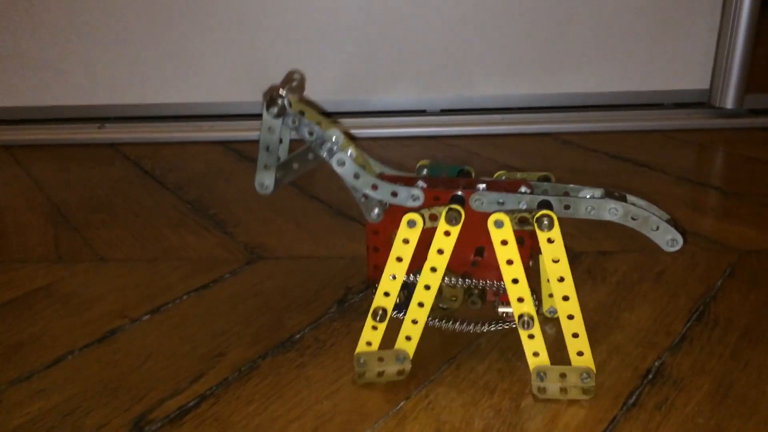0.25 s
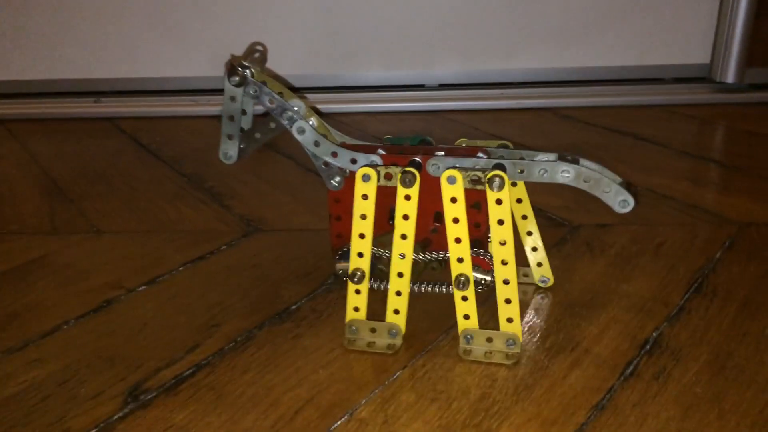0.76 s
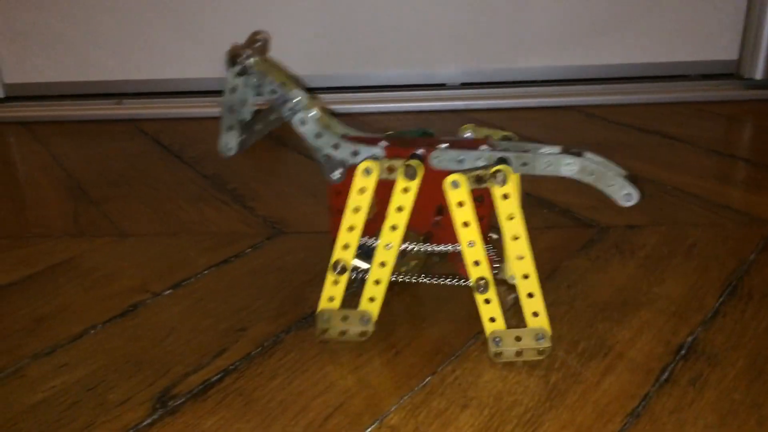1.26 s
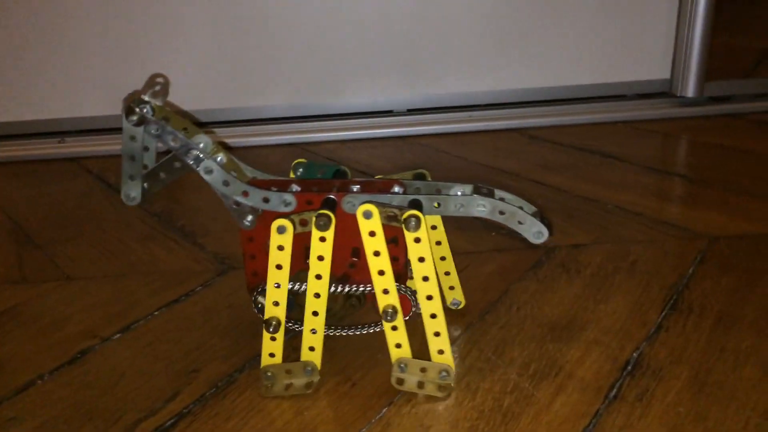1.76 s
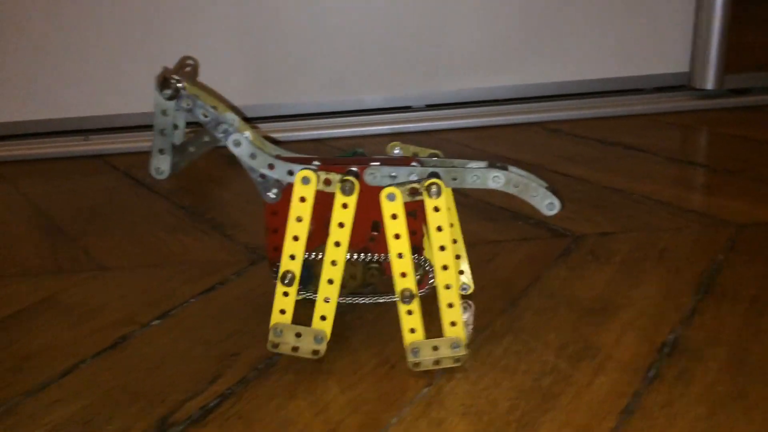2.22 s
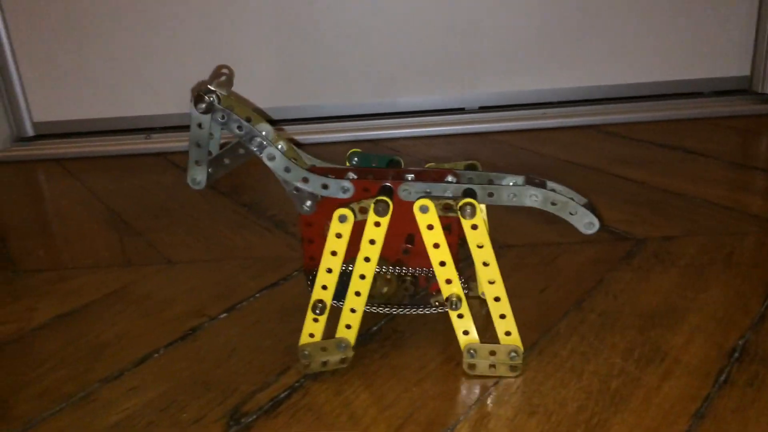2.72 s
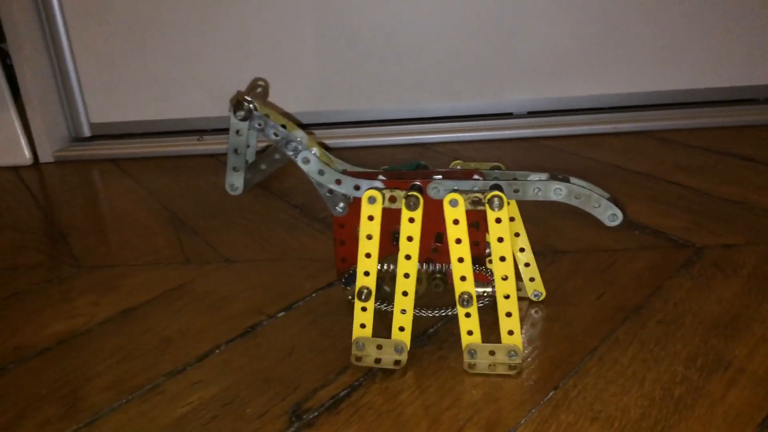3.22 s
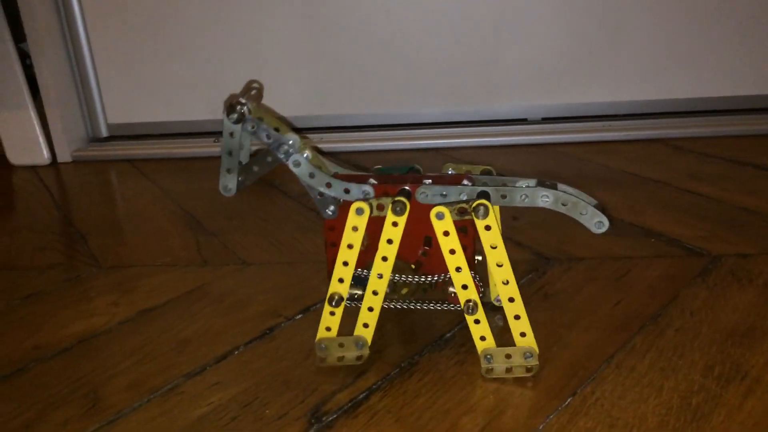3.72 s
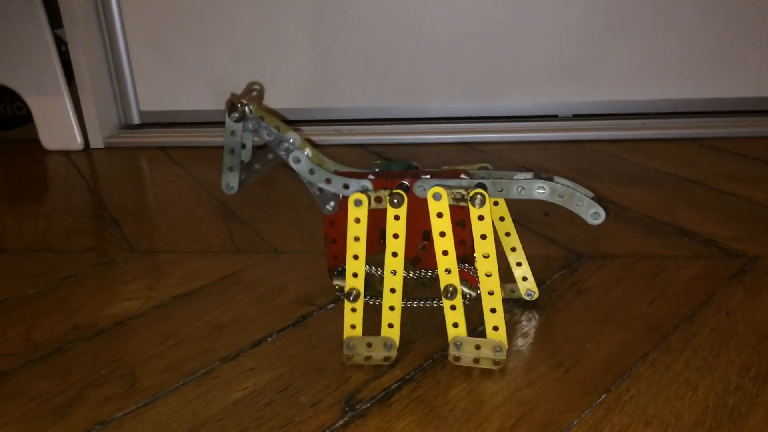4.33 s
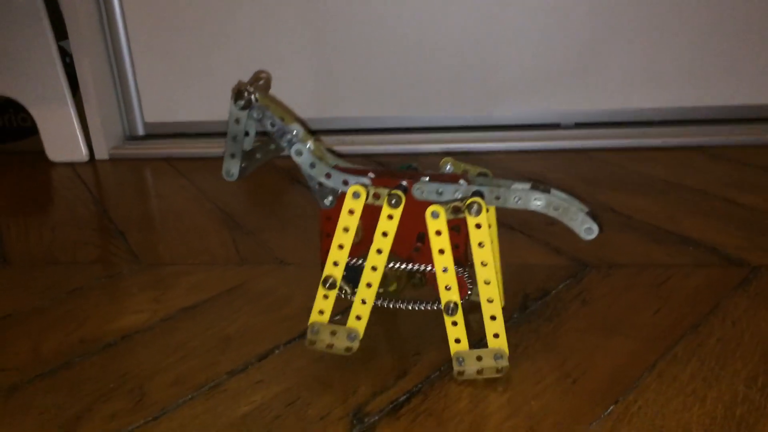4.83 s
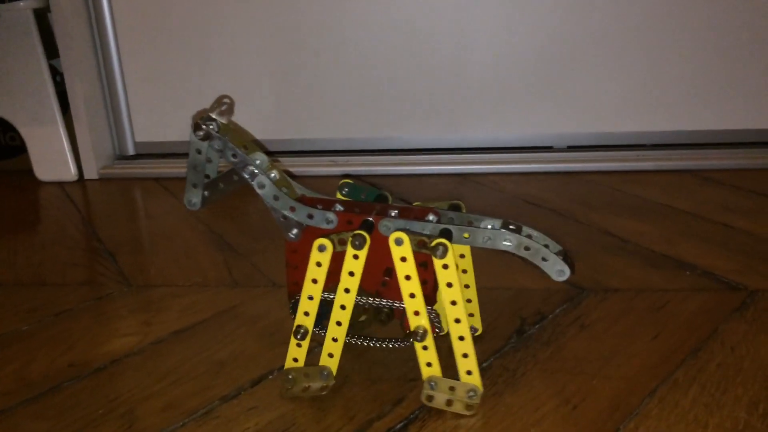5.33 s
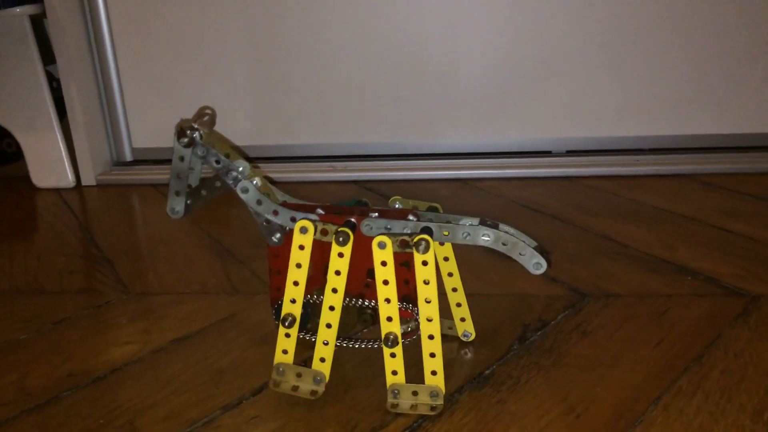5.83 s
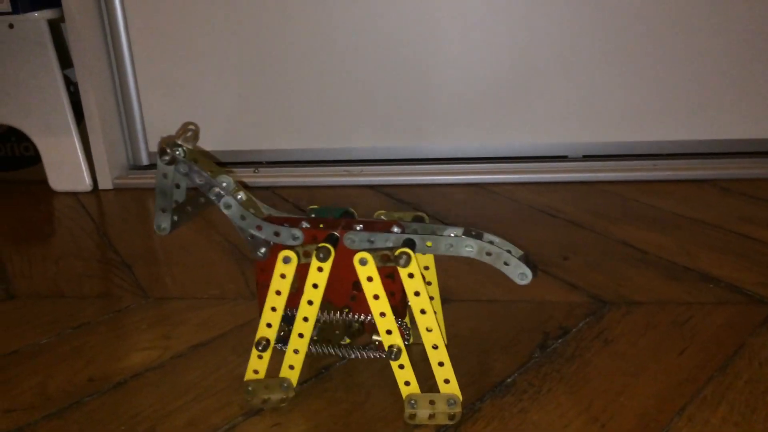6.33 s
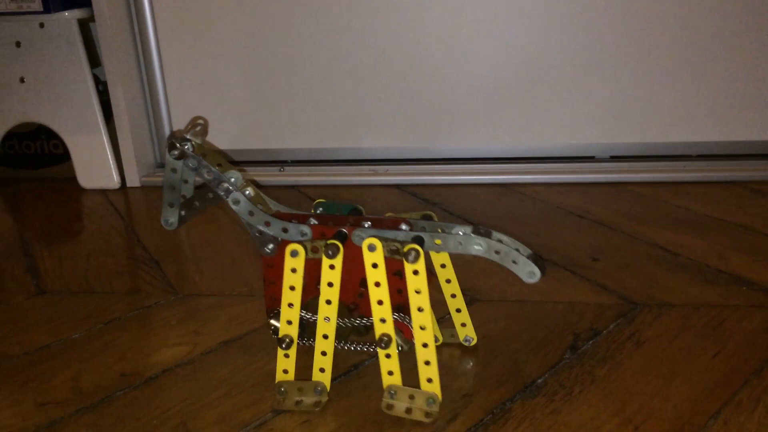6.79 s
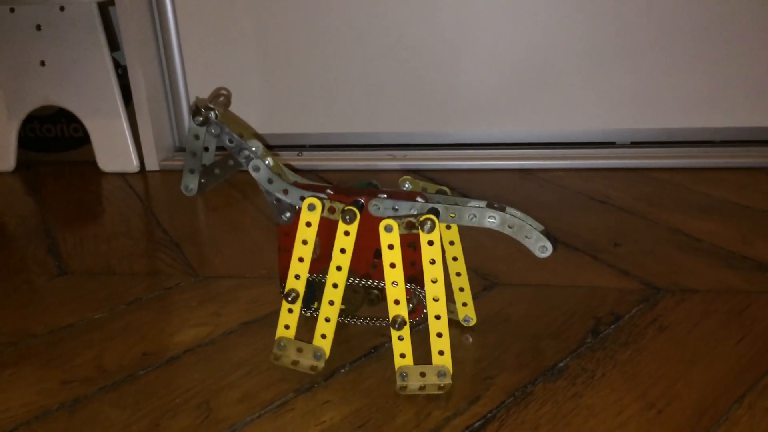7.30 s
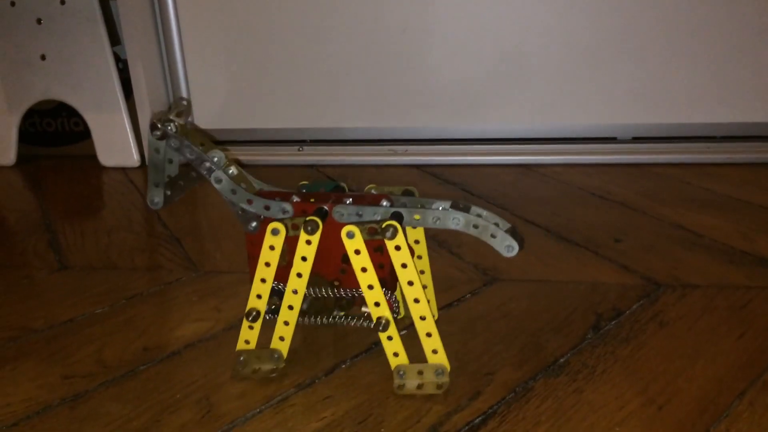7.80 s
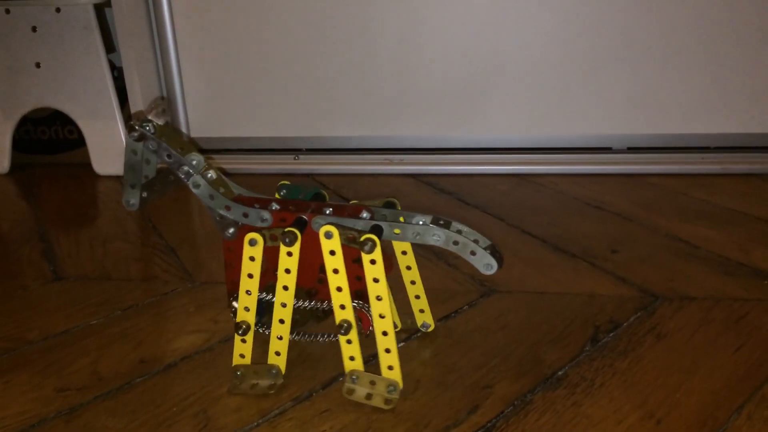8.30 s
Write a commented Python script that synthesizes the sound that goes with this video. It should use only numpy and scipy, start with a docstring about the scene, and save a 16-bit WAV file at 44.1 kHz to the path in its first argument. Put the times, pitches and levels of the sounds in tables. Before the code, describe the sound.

A clockwork toy whirrs and hums in surges as its metal feet clack and thump steadily across a wooden floor.

```python
"""A clockwork animal of bolted metal strips walks over a parquet floor in a small room.
From the start its governor (a spinning brake) whirrs against the steel frame and makes the boards hum.
In each stride the motor slows to lift the body, then races as it drops and two feet clack and thump down.
As the walk goes on, one droning floorboard fades away. Near the end the spring almost stalls and
single ticks of the drive stand out; the feet land once more, and the last stride is left unfinished."""
import sys
import numpy as np
from scipy import signal
from scipy.io import wavfile
from scipy.ndimage import uniform_filter1d

SR = 44100
rng = np.random.default_rng(int(sys.argv[2]) if len(sys.argv) > 2 else 0)


def transcribe(signal):
    """Save signal, clipped to [-1, 1], as a 16-bit WAV file at the path in sys.argv[1]."""
    frames = np.atleast_2d(signal).T
    limited = np.clip(frames, -1, 1)
    pcm = np.round(limited * 32767).astype(np.int16)
    wavfile.write(sys.argv[1], SR, pcm)


N = 377055
TIME = np.arange(N) / SR
WALK_START_S, WALK_END_S = -0.25, 8.674   # the walk begins before the sound and ends after it

# Levels in the tables are relative: each function sets its own overall level.
# The motor in each stride:
# run_up_s, slowest_hz, fastest_hz, slow_whirr_db, fast_whirr_db, hum_db, hum_octave_db
STRIDES = [(.44, 82, 99, -31, -22.5, -26.5, -39.5), (0.41, 85.5, 102, -29.5, -23.5, -27, -48),
           (.38, 84.5, 100, -29.5, -23.5, -31, -31.5), (.43, 84.5, 99, -29.5, -23, -27, -47),
           (.42, 84, 96, -31.5, -23.5, -26.5, -38), (.35, 83, 95.5, -32.5, -24, -28.5, -35),
           (.40, 77.5, 90, -32.5, -24, -28.5, -32), (.42, 80, 91, -33.5, -24.5, -28, -37.5),
           (.36, 80.5, 92.5, -32.5, -24.5, -27, -37.5), (.41, 81.5, 91.5, -34.5, -24.5, -27.5, -30),
           (.39, 76, 91.5, -34.5, -24.5, -29, -28.5), (.38, 76, 88.5, -35, -25.5, -32.5, -37.5),
           (0.38, 55, 90, -49.5, -24.5, -39.5, -30.5), (.42, 46, 88, -47, -25, -38, -46)]
# Ringing notes of the steel frame and side plates:
# pitch_hz, width_hz, walk_start_db, walk_end_db, extra_db_per_db_of_rubbing
FRAME_NOTES = [(2160, 350, -13.5, 1.5, 0.07), (2780, 1130, -6, -13, 0.04), (3210, 604, -1, -4, -0.23),
               (3863, 910, -7, -5.5, 0.02), (4920, 1120, -5.5, -10.5, 0), (5890, 1420, -6, -5.5, -0.28),
               (7135, 650, -3, -4, -0.02), (7770, 370, -0.5, 0.5, -0.1), (8240, 570, -3, 1.5, 0.26),
               (10170, 2870, -1.5, -6.5, -0.03), (11670, 850, -2, -3.5, -0.7),
               (13180, 1320, -1.5, -1, -0.2), (14800, 2400, -4, -4, 0)]
# Two feet landing one just after the other: start_s, second_foot_delay_s, first_clack_db,
# second_clack_db, frame_jolt_db, first_thump_db, second_thump_db, scuff_hz, hollow_note_db
LANDINGS = [(0.412, .034, -24, -15, -31, -5, -12, 1040, -3),
            (0.947, 0.045, -13, -12, -24, -10, -11, 1500, 4),
            (1.575, 0.04, -19, -7.5, -12, -8.5, -27, 1180, 1.5),
            (2.125, 0.04, -15.5, -15.5, -24, -4, -8, 830, 1.5),
            (2.788, 0.034, -23.5, -9.5, -30, -5.5, -15, 1280, 1.5),
            (3.320, 0.046, -16, -18.5, -15, -7, -14.5, 1000, 4),
            (4.017, 0.03, -22.5, -23.5, -41, -8.5, -9.5, 800, -1),
            (4.568, 0.044, -15.5, -18, -22, -10.5, -14, 606, -9),
            (5.256, .037, -18.5, -15.5, -19, -28, -4.5, 1310, -5),
            (5.838, 0.039, -13.5, -10, -14, -20, -12.5, 1310, -1),
            (6.529, .031, -23, -15, -25, -18, -12.5, 1040, -15),
            (7.117, 0.042, -12, -11.5, -14.5, -24, -8, 1140, -10),
            (8.003, .035, -22.5, -16.5, -17, -9.5, -11, 654, -9)]
# The body rocking back on to a raised foot after some landings: start_s, clack_db, thump_db
ROCK_BACKS = [(0.569, -24.5, -21), (1.102, -32, -18), (1.759, -27.5, -21), (2.303, -38, -16),
              (2.928, -28, -27), (3.508, -36.5, -17.5), (4.141, -29, -17), (4.765, -30, -21),
              (8.171, -25, -25.5)]
# Ringing notes of leg and board under a foot: pitch_hz, level_db, ring_s (time to fade by 60 dB)
FOOT_NOTES = [(327, 7.5, 0.043), (378, -8.5, 0.11), (482, -6, 0.082), (593, -3.5, 0.078), (733, 3, 0.029),
              (760, -27, 0.018), (1020, -2.5, 0.043), (1206, 1, 0.015), (1350, -12.5, 0.049),
              (1370, 0, 0.017), (1760, 3.5, 0.012), (1980, -7, 0.014), (2265, -0.5, 0.017),
              (2880, -4, 0.054)]
# Deep notes of the floor: pitch_hz, level_db, ring_s
FLOOR_NOTES = [(92, -6.5, 0.15), (111.5, 0.5, 0.26), (126.6, 8, 0.16), (176.7, -4, 0.094),
               (225, -15.5, 0.12), (299.5, -4.5, 0.073), (341, -16, 0.13)]
# The clearest ticks of chain and linkage: start_s, level_db
CLEAR_TICKS = [(4.903, -22.5), (6.0305, -16.5), (6.7730, -22), (7.2400, -21), (7.2735, -23.5),
               (7.3160, -21.5), (7.3455, -16), (7.4000, -24.5), (7.4295, -19.5), (7.4675, -23.5),
               (7.4945, -18.5), (7.5620, -24), (7.5960, -24), (7.6560, -18), (8.1510, -25), (8.2170, -25),
               (8.2382, -18), (8.2730, -18), (8.3285, -28), (8.3925, -16.5)]
# Tone of the gear rumble carried by the floor: pitch_hz, level_db
RUMBLE_SPECTRUM = [(25, -21), (50, 1.5), (80, -1.5), (120, 17), (165, -16), (230, -3), (330, -30),
                   (480, -37), (730, -21), (1000, -24), (1600, -22), (2400, -17.5)]
# A droning floorboard fading as the animal leaves it behind: time_s, level_db
DRONE_FADE = [(0, -43), (1.1, -44), (3.4, -48), (4.4, -49), (6.2, -68), (8.55, -77)]
# Tone of the still room: pitch_hz, level_db
AIR_SPECTRUM = [(25, -28), (60, -16), (115, -2), (400, -36), (620, -21), (950, -19), (1600, -29),
                (3000, -2), (15000, -5)]


def motor():
    """Lifting the body brakes the motor. Gives its speed in Hz and the whirr, hum and octave in dB."""
    _, slow_hz, fast_hz, soft_db, loud_db, top_hum_db, stride_octave_db = np.transpose(STRIDES)
    _, since_s, until_s = gait()
    speed_hz = stride_curve(slow_hz, fast_hz, fall_per_s=115, hold_s=0.02, coast_s=0.035)
    # The governor lets go of its drum as it slows.
    whirr_db = stride_curve(soft_db, loud_db, fall_per_s=139, hold_s=0.034, coast_s=0.091)
    low_hum_db = top_hum_db - 1.11 * (loud_db - soft_db)
    hum_db = stride_curve(low_hum_db, top_hum_db, fall_per_s=84, hold_s=0, coast_s=0.15)
    # Around a landing the legs bear less weight and pass on less hum.
    hum_db -= 4 * bump(np.minimum(since_s, until_s), width_s=0.092)
    # A board rings when the hum's octave (twice its pitch) sweeps through the board's own note.
    octave_hz, board_hz, board_width_hz = 2 * speed_hz, 170, 17
    board_gain = (octave_hz / board_hz) ** 0.96 / np.hypot(1, 2 * (octave_hz - board_hz) / board_width_hz)
    stride_ends_s = np.r_[np.transpose(LANDINGS)[0], WALK_END_S]
    octave_db = np.interp(TIME, stride_ends_s, stride_octave_db) + 20 * np.log10(board_gain)
    octave_db += 1.5 * bump(since_s - 0.054, width_s=0.098)   # landing presses the legs on to that board
    return speed_hz, whirr_db, hum_db, octave_db


def gait():
    """At every sample: which stride it is, the seconds since it began and the seconds until it ends."""
    edges_s = np.r_[WALK_START_S, np.transpose(LANDINGS)[0], WALK_END_S]
    stride = np.searchsorted(edges_s[1:-1], TIME)
    return stride, TIME - edges_s[stride], edges_s[stride + 1] - TIME


def stride_curve(lows, highs, fall_per_s, hold_s, coast_s):
    """The shape of a stride: a steady fall, a low stretch, then a run-up that tops out before landing."""
    stride, since_s, until_s = gait()
    run_up_s = np.transpose(STRIDES)[0][stride]
    falling = np.r_[lows[0], highs][stride] - fall_per_s * np.maximum(since_s - hold_s, 0)
    risen = np.clip((run_up_s - until_s) / np.maximum(run_up_s - coast_s, 1e-3), 0, 1)
    return np.maximum(falling, lows[stride] + (highs - lows)[stride] * risen)


def whirr(pace, turns, whirr_db, hits_per_s=4500):
    """The governor rubs its drum and gear teeth meet: tiny hits that thin out and stutter when slow."""
    crowding = pace ** 3.3
    hits = rng.random(N) < hits_per_s * crowding / SR
    sizes = from_db(-rng.standard_normal(N)) / np.sqrt(crowding)
    throb = 1 + 0.084 * np.cos(2 * np.pi * turns)
    stutter = from_db(drift(38) / pace ** 2.8)
    rub_db = np.maximum(whirr_db - np.median(whirr_db), -8)
    return rms_one(steel_frame(hits * sizes * throb * stutter, rub_db)) * from_db(whirr_db - 3)


def steel_frame(hits, rub_db=0):
    """Hits make the steel plates ring; the tone sways with the stance and shifts along the walk."""
    walked, out = TIME / TIME[-1], 0
    for hz, width_hz, start_db, end_db, rub_growth in FRAME_NOTES:
        ring = double_resonance(hits * rng.choice([-1, 1], N), hz, width_hz)
        level_db = start_db + (end_db - start_db) * walked + rub_growth * rub_db + 1.5 * drift(1.45)
        out += ring * from_db(level_db)
    return high_pass(out, hz=1900)


def footfalls():
    """Every touch of the floor: start_s, clack_db, jolt_db, thump_db, scuff_hz, hollow_note_db."""
    for start_s, delay_s, clack1_db, clack2_db, jolt_db, thump1_db, thump2_db, *spot in LANDINGS:
        yield start_s, clack1_db, jolt_db - 8, thump1_db, *spot   # the first foot jolts the frame less
        yield start_s + delay_s, clack2_db, jolt_db, thump2_db, *spot
    for start_s, clack_db, thump_db in ROCK_BACKS:
        yield start_s, clack_db, -np.inf, thump_db, 1360, 0   # rocking leaves the frame still


def clacks(bounce_s=0.017, bounce_loss_db=9):
    """A foot hits the wood and bounces once: it rings leg and board, scuffs, and jolts the frame."""
    wood, scuffs, jolts = np.zeros((3, N))
    for start_s, clack_db, jolt_db, _, scuff_hz, hollow_db in footfalls():
        notes = np.array(FOOT_NOTES)
        notes[0, 1] += hollow_db   # the lowest note is the board's and depends on the spot
        for at_s, peak_db in (start_s, clack_db), (start_s + bounce_s, clack_db - bounce_loss_db):
            blow = chatter(fade_s=0.0052, per_s=3000)
            ring = struck(notes, spread_db=1.5, detune=0.039)
            add(wood, at_s, signal.fftconvolve(blow, ring), peak_db - 10)
            slide = chatter(fade_s=0.013, per_s=3500)
            add(scuffs, at_s, double_resonance(slide, scuff_hz, width_hz=300), peak_db - 21)
        add(jolts, start_s, chatter(fade_s=0.011, per_s=10000), jolt_db - 5)
    return wood + scuffs + steel_frame(jolts)


def thumps(lag_s=0.00426, press_s=0.007):
    """Just after a foot touches, the weight comes down softly and sets the boards swinging."""
    out = np.zeros(N)
    onset = 1 - bump(TIME[:SR // 5], press_s)
    for start_s, _, _, thump_db, _, _ in footfalls():
        add(out, start_s + lag_s, onset * struck(FLOOR_NOTES, spread_db=0.5, detune=0.051), thump_db - 7)
    return out


def ticks(pace, whirr_db, loose_per_s=16):
    """Chain links and loose leg joints snap over and rattle the frame, mostly while the motor labours."""
    snaps = np.zeros(N)
    # Loose ticks come only below the usual pace, and grow rarer near a stall.
    loose = (rng.random(N) < loose_per_s * pace ** 2.5 / SR) & (pace < 1)
    loose_db = -23 + 0.47 * (whirr_db - np.median(whirr_db)) + 2.5 * rng.standard_normal(N)
    for start_s, tick_db in CLEAR_TICKS + list(zip(TIME[loose], loose_db[loose])):
        add(snaps, start_s, chatter(fade_s=0.003, per_s=9000, swell_s=0.012), tick_db - 5.5)
    links = high_pass(resonance(snaps, hz=3800, width_hz=3500), hz=1770)
    return steel_frame(snaps) + from_db(-3) * links


def hum(turns, hum_db, octave_db):
    """The governor is off balance and shakes the floor through the legs, once and twice a turn."""
    low_note = from_db(hum_db - 1 + 4.5 * drift(16)) * np.sin(2 * np.pi * turns)
    octave = from_db(octave_db - 5.5 + 3.5 * drift(16)) * np.sin(2 * np.pi * 2 * turns)
    return np.sqrt(2) * (low_note + octave)


def rumble(pace):
    """The gears tremble more the faster they run, and keep the floor's strongest note booming."""
    boom = rms_one(resonance(rng.standard_normal(N), hz=117, width_hz=14))
    tremor = from_db(-40) * coloured_noise(RUMBLE_SPECTRUM) + from_db(-41) * boom
    return tremor * pace ** 1.63 * from_db(2 * drift(9.7))


def drone(turns):
    """Once a turn the motor nudges a floorboard, never twice alike."""
    nudges = np.diff(np.floor(turns), prepend=0) * (1 + 0.47 * rng.standard_normal(N))
    fade_db = np.interp(TIME, *np.transpose(DRONE_FADE))
    return rms_one(double_resonance(nudges, hz=318, width_hz=175)) * from_db(fade_db - 8.5)


def room(sound, echo_db=-13, first_echo_s=0.0069, ring_s=0.22):
    """A blur of echoes from door and walls follows the direct sound."""
    t = TIME[:SR // 2]
    tail = rng.standard_normal(len(t)) * from_db(-60 * t / ring_s) * (t > first_echo_s)
    return sound + from_db(echo_db) * signal.fftconvolve(sound, tail / np.linalg.norm(tail))[:N]


def room_air():
    """The faint, steady hiss of the still room."""
    return from_db(-53.5) * coloured_noise(AIR_SPECTRUM)


def chatter(fade_s, per_s, swell_s=0.003):
    """Loose parts meet in a quick run of tiny touches that swells and dies."""
    t = TIME[:SR // 16]
    touches = (rng.random(len(t)) < per_s / SR) | (t == 0)
    swell = 1 - np.exp(-(t + 1 / SR) / swell_s)
    return touches * rng.choice([-1, 1], len(t)) * np.exp(-t / fade_s) * swell


def struck(notes, spread_db, detune):
    """Notes ring and fade after a blow, each a little different in strength and pitch every time."""
    t = TIME[:SR // 5]
    hz, level_db, ring_s = np.transpose(notes)[:, :, None]
    strength, shift = rng.standard_normal((2, len(notes), 1))
    fades = from_db(level_db + spread_db * strength - 60 * t / ring_s)
    return np.sum(fades * np.sin(2 * np.pi * hz * (1 + detune * shift) * t), axis=0)


def add(track, start_s, sound, level_db):
    """Lay a sound into a track; its level is that of its loudest two milliseconds."""
    start = max(round(start_s * SR), 0)
    loudest = np.sqrt(uniform_filter1d(sound ** 2, size=SR // 500).max())
    track[start:start + len(sound)] += (from_db(level_db) * sound / loudest)[:N - start]


def coloured_noise(spectrum):
    """Noise built from half-octave bands, each turned up or down to follow a spectrum."""
    hz, level_db = np.transpose(spectrum)
    edges_hz = 20 * 2 ** np.arange(0, 10, 0.5)
    white, out = rng.standard_normal((2, N)), 0
    for k, (low, high) in enumerate(zip(edges_hz, edges_hz[1:])):
        if low < hz[-1]:
            band = signal.sosfilt(signal.butter(2, [low, high], "band", fs=SR, output="sos"), white[k % 2])
            out += band * from_db(np.interp(np.log(low * high) / 2, np.log(hz), level_db))
    return rms_one(out)


def drift(rate_hz, step=40):
    """A smooth random wobble of typical size 1, worked out once every step samples."""
    r = np.exp(-2 * np.pi * rate_hz * step / SR)
    slow = signal.lfilter([1], [1, -2 * r, r * r], rng.standard_normal(N // step + 2002))[2000:]
    return np.interp(np.arange(N) / step, np.arange(len(slow)), rms_one(slow))


def resonance(sound, hz, width_hz):
    """Let through the part of a sound near one pitch."""
    r = np.exp(-np.pi * width_hz / SR)
    feedback = [1, -2 * r * np.cos(2 * np.pi * hz / SR), r * r]
    return signal.lfilter(np.array([1, 0, -1]) * (1 - r * r) / 2, feedback, sound + 1e-18)


def double_resonance(sound, hz, width_hz):
    """The same resonance twice, for a clearer pitch."""
    return resonance(resonance(sound, hz, width_hz), hz, width_hz)


def high_pass(sound, hz):
    """Cut away what lies below a pitch."""
    return signal.sosfilt(signal.butter(4, hz, "high", fs=SR, output="sos"), sound + 1e-18)


def bump(t, width_s):
    """A smooth hump of height 1 around zero."""
    return np.exp(-(t / width_s) ** 2)


def from_db(db):
    """Turn decibels into a number to multiply by."""
    return 10 ** (np.asarray(db) / 20)


def rms_one(sound):
    """Scale a sound to an average strength (rms) of 1."""
    return sound / np.sqrt(np.mean(sound ** 2) + 1e-20)


def scene():
    """The motor and the footsteps sound through the metal and the floor, over the room's hiss."""
    speed_hz, whirr_db, hum_db, octave_db = motor()
    pace = speed_hz / np.median(speed_hz)   # 1 is the usual speed
    turns = np.cumsum(speed_hz * (1 + 0.0051 * drift(14))) / SR   # the governor's turns so far
    air = room_air()
    floor = hum(turns, hum_db, octave_db) + rumble(pace) + drone(turns) + thumps()
    metal = whirr(pace, turns, whirr_db) + clacks() + ticks(pace, whirr_db)
    return (room(metal) + floor + air)[None]


def record(dry):
    """Cut the highest treble steeply, above 15250 Hz."""
    return signal.sosfilt(signal.ellip(12, 0.2, 80, 15250, fs=SR, output="sos"), dry)


dry = scene()
out = record(dry)
transcribe(out)
```